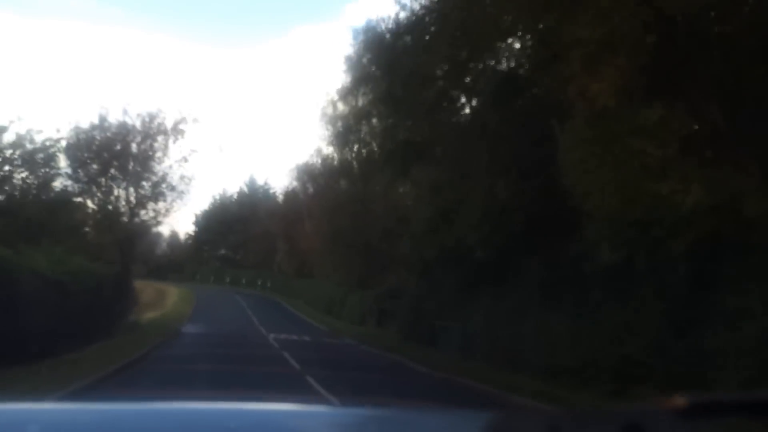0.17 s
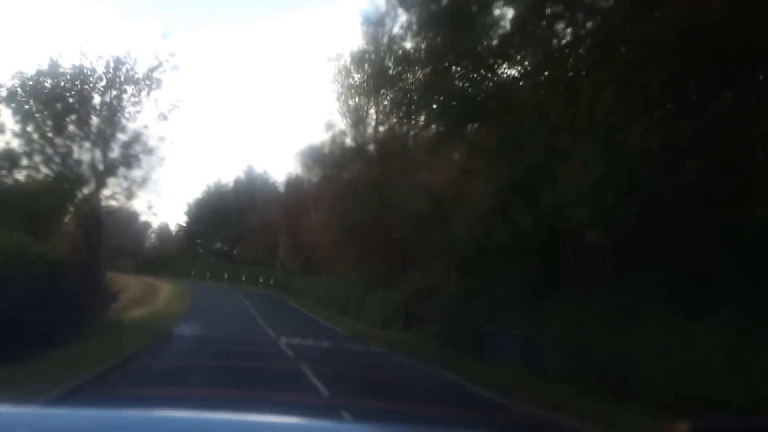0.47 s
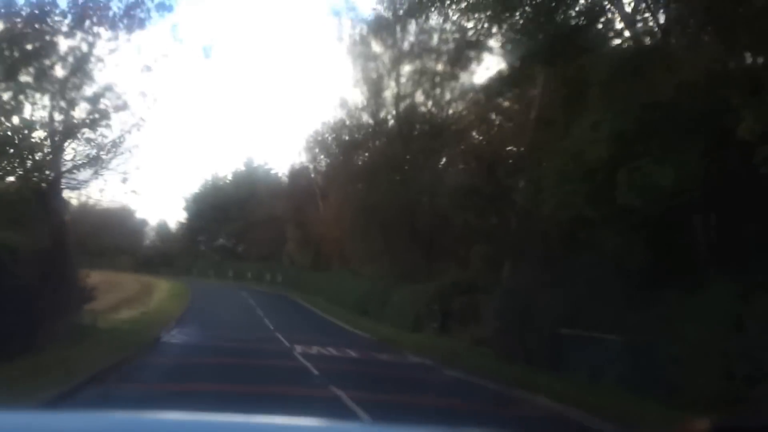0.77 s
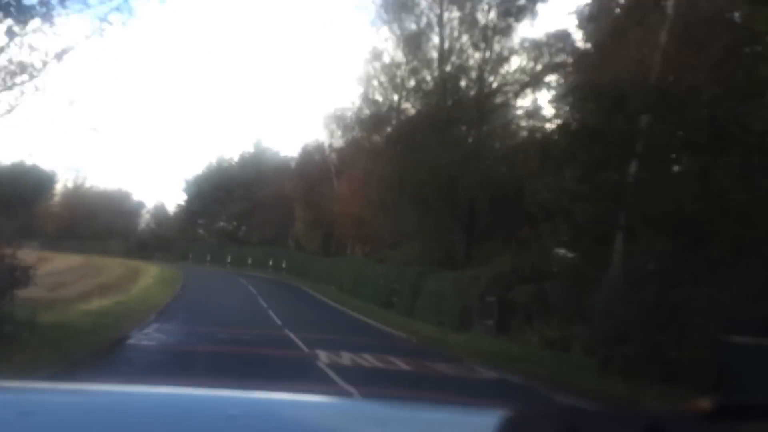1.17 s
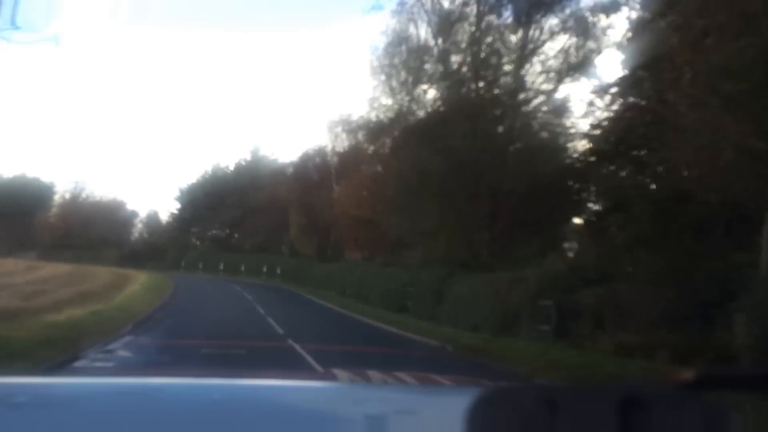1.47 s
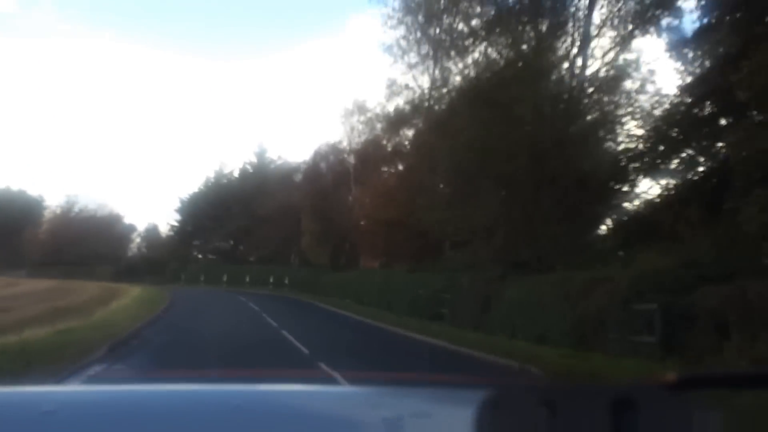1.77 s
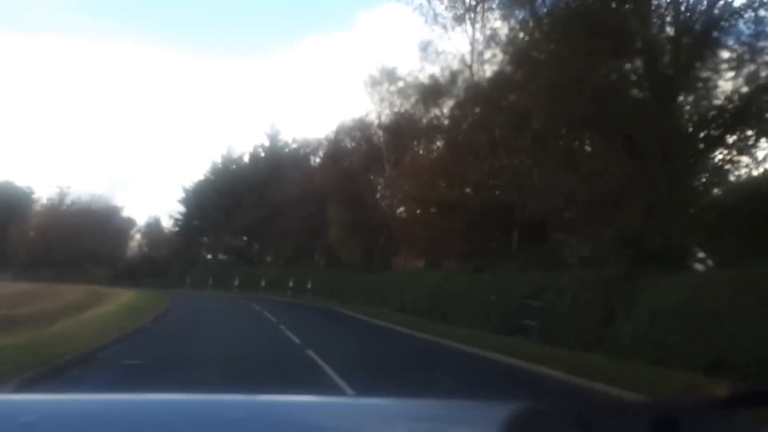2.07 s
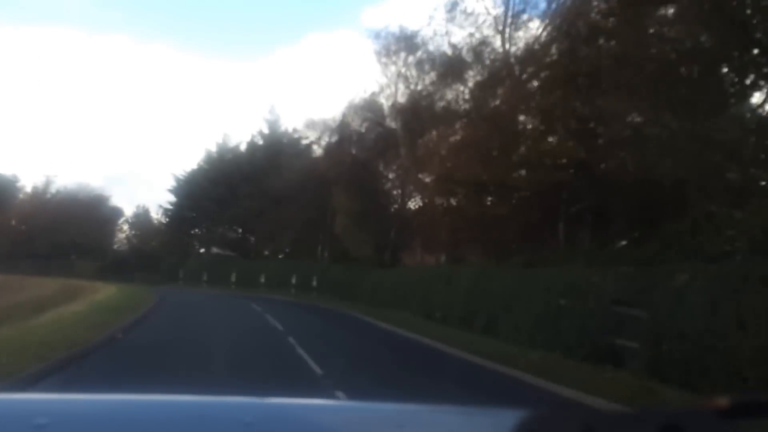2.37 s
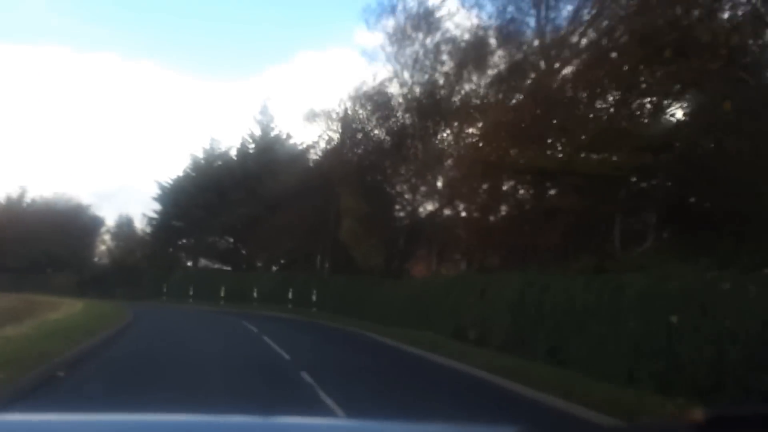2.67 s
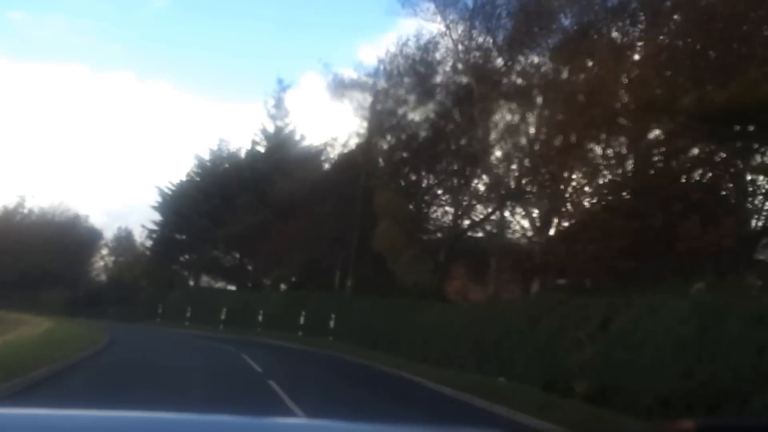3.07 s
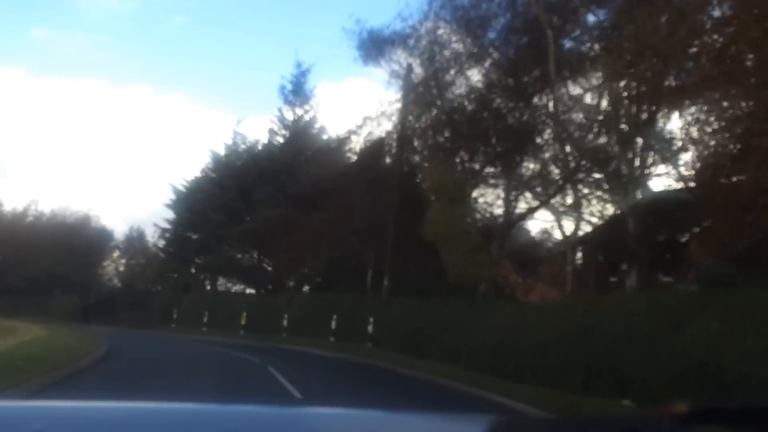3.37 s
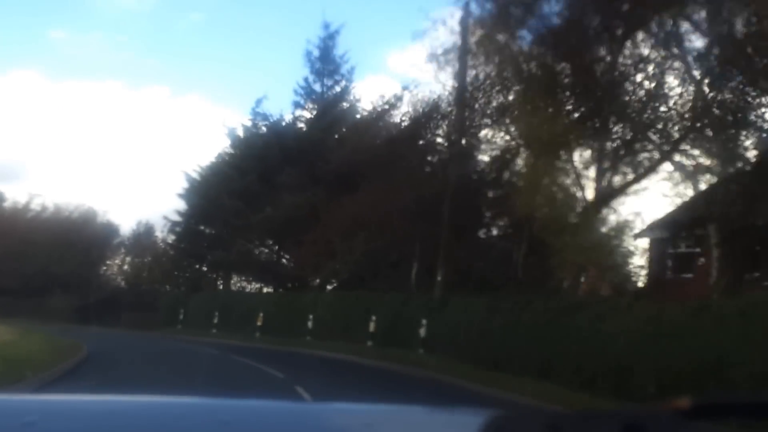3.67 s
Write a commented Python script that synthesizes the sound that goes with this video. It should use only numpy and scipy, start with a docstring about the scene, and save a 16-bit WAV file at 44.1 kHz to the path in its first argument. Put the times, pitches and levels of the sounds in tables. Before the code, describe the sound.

A turbo car's engine roars inside the cabin, vents air sharply, clunks and settles lower

```python
"""An engine pulls hard over road and air roar inside a five-cylinder turbo car on a damp country road. The throttle
shuts, and the blow-off valve whistles and hisses while the revs fall; two clunks lead into the next gear.
The engine is a stack of unsteady tones at multiples of its cycle rate. The roar is noise in bands that swell and
flicker, and the spray on the wheel arches is short grainy noise bursts. The whistle and the escaping air are
noise in moving bands and a broad hiss, and the clunks are dying tones of the floor."""
import sys
import numpy as np
from scipy import signal
from scipy.fft import rfft, irfft
from scipy.io import wavfile
from scipy.ndimage import uniform_filter1d, map_coordinates

SR = 44100
rng = np.random.default_rng(int(sys.argv[2]) if len(sys.argv) > 2 else 0)


def to_wav(s):
    """Save 16-bit WAV."""
    ch = np.atleast_2d(s).T  # columns
    pcm = np.round(np.clip(ch, -1, 1) * 32767)  # PCM
    wavfile.write(sys.argv[1], SR, pcm.astype(np.int16))


N = 168903
T = np.arange(N) / SR  # time of each sample, s
HZ = np.fft.rfftfreq(N, 1 / SR)  # frequency of each bin of the transform


def undb(db):
    """Turn decibels into a plain multiplier."""
    return 10 ** (np.asarray(db) / 20)


def unit(x):
    """Scale a sound to an average (RMS) level of 1."""
    return x / np.sqrt(np.mean(x ** 2))


def curve(table, col):
    """Draw one column of a table as a line over time; column 0 holds the seconds."""
    return np.interp(T, [row[0] for row in table], [row[col] for row in table])


def over_hz(table):
    """Spread a table of frequencies and values over the transform's bins, along a log scale."""
    return np.interp(np.log(HZ + 1), np.log([row[0] for row in table]), [row[1] for row in table])


def walk(rate):
    """Random levels, `rate` new ones a second, smoothed twice into a wandering line of spread 1."""
    hold = max(int(SR / rate), 2)  # samples
    steps = np.repeat(rng.standard_normal(N // hold + 1), hold)
    line = uniform_filter1d(uniform_filter1d(steps, hold), hold)[:N]
    return line / line.std()


def fade(at_s, len_s):
    """A straight ramp from 0 to 1, centred on at_s."""
    return np.clip((T - at_s) / len_s + .5, 0, 1)


# How alike the noise at the two ears is.
# Each row: frequency in Hz, likeness from 0 (unrelated) to 1 (the same).
EAR_LIKENESS = [(30, 0.9), (200, 1), (350, 0.85), (600, 0.53), (1300, 0.63), (2500, 0.22), (6000, 0),
                (12000, 0)]


def pair_noise():
    """Spectra of left and right noise, as alike as the cabin makes them: a shared part plus an opposed part."""
    like = np.clip(over_hz(EAR_LIKENESS), 0, 1)
    shared, opposed = rfft(rng.standard_normal((2, N)))
    sign = np.array([[1], [-1]])
    return np.sqrt((1 + like) / 2) * shared + np.sqrt((1 - like) / 2) * opposed * sign


def whirr(hz, width_hz):
    """Noise in a narrow band whose centre and width can move: a tone shaken by slow random noise."""
    # a wider band reads through the random points faster
    clock = np.cumsum(np.broadcast_to(width_hz, N)) / SR
    points = rng.standard_normal((3, 2, 8000))
    slow = np.array([[map_coordinates(p, [clock], mode="wrap") for p in pair] for pair in points])
    phase = 2 * np.pi * np.cumsum(hz) / SR
    bands = slow[:, 0] * np.cos(phase) + slow[:, 1] * np.sin(phase)
    return unit(bands[0] + bands[1:])  # one band for both ears, plus one for each ear


# The colour of the road and air roar, before its bands move.
# Each row: frequency in Hz, level in dB per Hz.
ROAR_COLOUR = [(15,-42),(30,-23),(50,-13.5),(80,-16.5),(110,-17.5),(160,-20),(214,-9),(290,-11),(370,-6.5),(438,-5.5),(520,-8),(600,-7),(720,-10.5),(850,-13),(1050,-15.5),(1250,-12),(1450,-18),(1690,-24.5),(2110,-26.5),(2600,-31.5),(3270,-38),(4700,-41),(6000,-43),(8130,-43.5),(10100,-50),(11600,-60),(12600,-70),(14500,-110)]
# The lift of the roar's treble, intake air included.
# Each row: time in seconds, lift in dB.
TREBLE_LIFT = [(0, 12), (.75, 10), (1.0, 12.5), (1.6, 7), (2.5, 6), (3.83, 3.5)]
# The lift of the deep road rumble.
# Each row: time in seconds, lift in dB.
RUMBLE_LIFT = [(0, -8), (.8, -3), (1.1, 3), (2, 2), (2.7, 5), (3, -2.5), (3.83, -9)]
TREBLE_HZ, RUMBLE_HZ = 2930, 92  # each lift has half its strength here
ROAR_DB = -15.5  # average level of the whole roar
SWELL_DB, SWELL_RATE, FLICKER_DB, FLICKER_RATE = .3, 1.58, 1.0, 10  # spreads in dB, new levels per second
# throb once an engine cycle, and quick jolts from the road surface; each band takes at most half of them
THROB_DB, JOLT_DB, JOLT_RATE = 0.4, 1.26, 90.2


def roar(phase):
    """Road and air noise in half-octave bands that swell together while each flickers alone."""
    spectrum = pair_noise() * undb(over_hz(ROAR_COLOUR))
    swell = SWELL_DB * walk(SWELL_RATE)
    shake = THROB_DB * np.cos(phase) + JOLT_DB * walk(JOLT_RATE)
    treble, rumble = curve(TREBLE_LIFT, 1), curve(RUMBLE_LIFT, 1)
    half_octaves = 2 * np.log2(HZ / 20 + 1e-9)  # counted up from 20 Hz
    total = 0
    for b in range(20):
        centre_hz = 20 * 2 ** (b / 2)
        window = np.cos(np.pi / 2 * np.clip(half_octaves - b, -1, 1)) ** 2
        band = irfft(spectrum * window, N)
        treble_share = 1 / (1 + (TREBLE_HZ / centre_hz) ** 3)
        rumble_share = 1 / (1 + (centre_hz / RUMBLE_HZ) ** 4)
        level_db = swell + FLICKER_DB * walk(FLICKER_RATE)
        level_db = level_db + treble_share * treble + rumble_share * rumble
        if b > 7:  # from 320 Hz up; the shake turns upside down above TREBLE_HZ
            level_db = level_db + (0.5 - treble_share) * shake
        total = total + band * undb(level_db)
    return unit(total) * undb(ROAR_DB)


# Spray and grit hitting the wheel arches.
# Each row: peak time in seconds, level in dB, rise in seconds, decay in seconds, extra level of the bright part in dB.
SPRAY_HITS = [(1.766, -33, .002, .012, -1), (1.797, -30, 0.0016, 0.011, -1),
              (1.846, -24, 0.023, 0.023, 0.5), (2.049, -15, 0.0022, 0.0054, 6),
              (2.056, -24.5, 0.0046, 0.027, -2), (2.135, -29, 0.0036, .015, -1),
              (2.152, -26, 0.012, 0.025, -4), (2.415, -27, .003, 0.02, -3), (2.461, -20, 0.0022, .004, 1),
              (2.474, -23, 0.023, .016, -1.5), (2.727, -27, .004, .01, -3), (2.764, -23.5, 0.008, 0.021, 4),
              (2.80, -30, 0.0095, .012, -6), (3.163, -29.5, .0015, 0.0092, 9.5)]
# The colour of the spray. Each row: frequency in Hz, level in dB.
SPRAY_COLOUR = [(600, -18.5), (1500, -3.5), (3000, -7.5), (4500, -9.5), (6800, -9), (9000, -10.5),
                (11000, -15.5), (12500, -19.5), (15000, -38)]
GRAIN_DB, GRAIN_RATE = 1.2, 710  # spread of the grain in dB, new levels per second
SPRAY_SPLIT_HZ = 4400  # the bright part lies above


def spray():
    """Bursts of noise that grow and die exponentially; the dull and the bright part have their own grain."""
    dull_env, bright_env = 0, 0
    for peak_s, db, rise_s, decay_s, bright_db in SPRAY_HITS:
        burst = undb(db) * np.exp(-np.where(T < peak_s, (peak_s - T) / rise_s, (T - peak_s) / decay_s))
        dull_env = dull_env + burst
        bright_env = bright_env + burst * undb(bright_db)
    noise = pair_noise() * undb(over_hz(SPRAY_COLOUR))
    bright = 1 / (1 + (SPRAY_SPLIT_HZ / (HZ + 1)) ** 8)
    size = np.std(irfft(noise, N))

    def grainy(part):
        """One part of the noise, roughened by quick random levels."""
        return irfft(noise * part, N) / size * undb(GRAIN_DB * walk(GRAIN_RATE))

    return grainy(1 - bright) * dull_env + grainy(bright) * bright_env


# The blows of the gear change.
# Each row: start in seconds, level in dB, extra level of the floor's upper tones in dB.
GEAR_CLUNKS = [(1.544, -1.5, -8), (1.59, -16.5, 9)]
# The tones at which the floor rings.
# Each row: frequency in Hz, level in dB, time to die away by 60 dB in seconds.
FLOOR_TONES = [(118.7, -7.5, 0.26), (184, -0.5, 0.21), (300, -8, 0.25), (384, 0, 0.34), (451, -4, 0.29)]
CLUNK_RISE_S, UPPER_HZ = 0.019, 250  # the upper tones lie above UPPER_HZ


def clunk():
    """The driveline takes up its slack in two blows; each rings the floor as a set of dying tones."""
    total = 0
    for start_s, db, upper_db in GEAR_CLUNKS:
        t = np.maximum(T - start_s, 0)
        ring = 0
        for hz, tone_db, t60_s in FLOOR_TONES:
            level = undb(tone_db + upper_db * (hz > UPPER_HZ))
            ring = ring + level * np.sin(2 * np.pi * hz * t) * np.exp(-np.log(1000) * t / t60_s)
        total = total + undb(db) * ring * (1 - np.exp(-t / CLUNK_RISE_S))
    return total


# The course of the engine; the cycle rate is half the crank speed.
# Each row: time in seconds, cycle rate in Hz, engine level in dB.
ENGINE_CYCLE = [(0.0, 40.85, 3), (0.8, 42.58, 0.5), (1.01, 40.09, -2), (1.57, 30.97, -1),
                (1.67, 29.24, 1.5), (1.78, 29.85, 0.5), (2.12, 29.34, 0), (2.27, 30, 1), (2.68, 29.52, 0.5),
                (2.87, 29.87, 0.5), (3.01, 29.45, 0.5), (3.83, 29.43, 0)]
# The engine's tones as the cabin hears them: pulling, with the throttle shut, and in the next gear.
# Each row: multiple of the cycle rate, level in dB.
PULLING = [(3,-20.5),(4,-12.5),(5,-1),(6,-15),(7,-14),(8,-15.5),(9,-11.5),(10,-17),(11,-16),(12,-12),(13,-15),(14,-21.5),(15,-33),(16,-17),(17,-33),(18,-17.5)]
SHUT = [(3, -3.5), (4, -4), (5, -3.5), (6, -9), (7, -8), (8, -11), (9, -15), (10, -16.5), (11, -17.5),
        (12, -10.5), (13, -13), (14, -25), (15, -29), (16, -31), (17, -22), (18, -25)]
NEXT_GEAR = [(3,-23.5),(4,-7.5),(5,-6),(6,-15),(7,-1),(8,-4.5),(9,-15.5),(10,-14.5),(11,-16.5),(12,-14),(13,-18),(14,-16),(15,-11),(16,-15.5),(17,-13.5),(18,-21)]
# Cabin booms that the falling tones slide through while the throttle is shut.
# Each row: frequency in Hz, boost in dB.
CABIN_BOOM = [(80, -8), (100, -10.5), (120, -1), (165, -3), (205, 2.5), (230, 2), (255, 5), (320, -4),
              (380, -2.5), (435, 7), (500, 0), (700, -2)]
PULLING_DB, SHUT_DB, NEXT_GEAR_DB = -14, -14.5, -16  # added to every row of the three mixes
SHUT_S, SHUT_FADE_S = 0.913, .04  # throttle shuts
CLUTCH_OUT_S, BITE_S, BITE_FADE_S = 1.55, 1.594, 0.025  # clutch lets go, then bites
# unsteadiness of each tone as a share of its strength, and new values per second
WOBBLE, SHUT_WOBBLE, WOBBLE_RATE, DRIFT, DRIFT_RATE = .2, .22, 25.97, 0.14, 14.


def engine(phase):
    """Unsteady tones at multiples of the engine cycle; their mix changes with load and gear."""
    shut = fade(SHUT_S, SHUT_FADE_S)
    coast = shut * (1 - fade(CLUTCH_OUT_S, BITE_FADE_S))
    bite = fade(BITE_S, BITE_FADE_S)
    rate_hz, total = curve(ENGINE_CYCLE, 1), 0
    boom_hz, boom_db = np.array(CABIN_BOOM).T
    for (k, pull_db), (_, coast_db), (_, next_db) in zip(PULLING, SHUT, NEXT_GEAR):
        boom = np.interp(k * rate_hz, boom_hz, boom_db)
        level = undb(PULLING_DB + pull_db) * (1 - shut)
        level = level + undb(SHUT_DB + coast_db + boom) * coast
        level = level + undb(NEXT_GEAR_DB + next_db) * bite
        # the wobble moves strength and phase, the drift strength only
        wobble = (WOBBLE + SHUT_WOBBLE * coast) * (walk(WOBBLE_RATE) + 1j * walk(WOBBLE_RATE))
        unsteady = 1 + wobble + DRIFT * walk(DRIFT_RATE)
        tone = np.exp(1j * (k * phase + 2 * np.pi * rng.random()))
        total = total + level * np.real(unsteady * tone)
    return np.sqrt(2) * total * undb(curve(ENGINE_CYCLE, 2))


# The valve's whistle, which splits in two.
# Each row: time in seconds, upper pitch in Hz, lower pitch in Hz, band width in Hz, level in dB.
WHISTLE_PATH = [(.795, 6450, 6460, 150, -52), (.812, 6420, 6300, 150, -25), (.835, 6350, 6050, 302, -19),
                (.86, 6280, 5820, 400, -22.5), (.9, 6250, 5800, 550, -26), (.94, 6250, 5800, 600, -31),
                (.99, 6220, 5850, 603, -36), (1.05, 6200, 5850, 600, -60)]
# The escaping air.
# Each row: time in seconds, centre in Hz, level of the narrow band in dB, level of the broad hiss in dB.
AIR_PATH = [(.8, 6900, -62, -49), (.83, 6900, -32, -28), (.91, 6960, -27, -25.5), (1.0, 7020, -33, -31.5),
            (1.06, 6970, -31.5, -35), (1.18, 6780, -30.5, -35.5), (1.35, 6550, -34, -40),
            (1.6, 6300, -49, -50), (1.7, 6300, -63, -65)]
LOWER_DB, OVERTONE_DB = -3, -27  # against the upper whistle
AIR_WIDTH_HZ, HISS_HZ, HISS_WIDTH_HZ = 980, 6500, 9600


def valve():
    """A breathy whistle that sags and splits as the valve opens, its faint overtone, then escaping air."""
    upper_hz, lower_hz, width_hz = (curve(WHISTLE_PATH, col) for col in (1, 2, 3))
    whistle = whirr(upper_hz, width_hz) + undb(LOWER_DB) * whirr(lower_hz, width_hz)
    whistle = whistle + undb(OVERTONE_DB) * whirr(upper_hz + lower_hz, 2 * width_hz)
    hiss_shape = 1 / (1 + ((HZ - HISS_HZ) / (HISS_WIDTH_HZ / 2)) ** 6)
    hiss = unit(irfft(pair_noise() * hiss_shape, N))
    air = whirr(curve(AIR_PATH, 1), AIR_WIDTH_HZ) * undb(curve(AIR_PATH, 2))
    air = air + hiss * undb(curve(AIR_PATH, 3))
    sounding = (T > WHISTLE_PATH[0][0]) * (T < AIR_PATH[-1][0])
    return (whistle * undb(curve(WHISTLE_PATH, 4)) + air) * sounding


# The balance of the two ears. Each row: frequency in Hz, left minus right in dB.
LEFT_MINUS_RIGHT = [(30, 4), (200, 5), (350, 0), (700, -0.8), (1400, -.4), (2800, -1.3), (5500, -3),
                    (10000, 0.5)]
LEFT_LAG_S = 0.000365  # the left hears everything this much later


def scene():
    """Add up all sources, then share the level and time difference equally between left and right."""
    phase = 2 * np.pi * np.cumsum(curve(ENGINE_CYCLE, 1)) / SR
    both = rfft(roar(phase) + spray() + clunk() + engine(phase) + valve())
    half = np.array([[.5], [-.5]])  # left, right
    balance = undb(half * over_hz(LEFT_MINUS_RIGHT))
    delay = np.exp(-2j * np.pi * HZ * LEFT_LAG_S * half)
    return irfft(both * balance * delay, N)


DRIVE, TOP_HZ = 0.4, 14900  # strength of the rounding, upper limit of the sound


def record(dry):
    """Round the loudest peaks with a soft curve, then cut off the top with a steep filter."""
    rounded = np.tanh(DRIVE * dry) / DRIVE
    low_pass = signal.ellip(8, .2, 70, TOP_HZ, fs=SR, output="sos")
    return np.clip(signal.sosfilt(low_pass, rounded), -1, 1)


dry = scene()
out = record(dry)
to_wav(out)
```